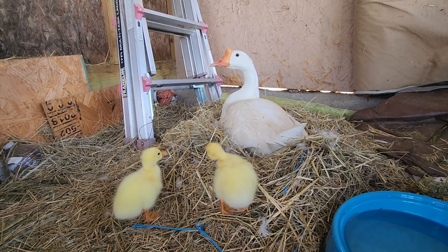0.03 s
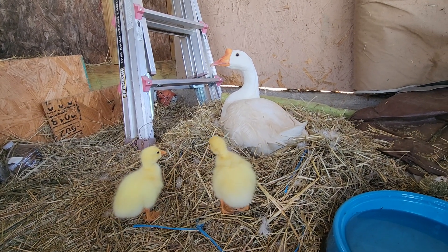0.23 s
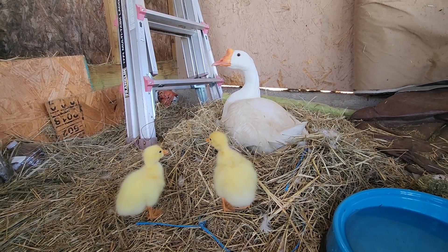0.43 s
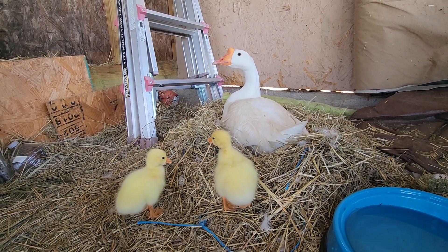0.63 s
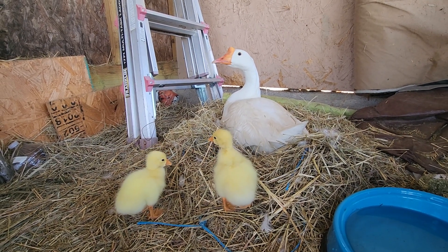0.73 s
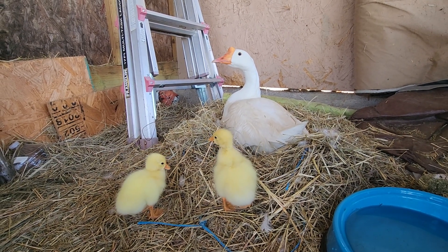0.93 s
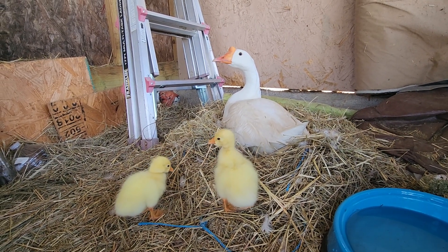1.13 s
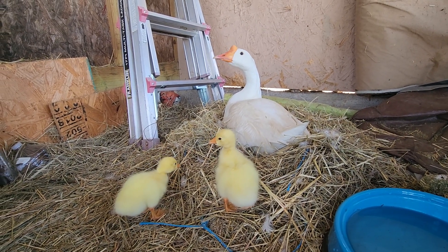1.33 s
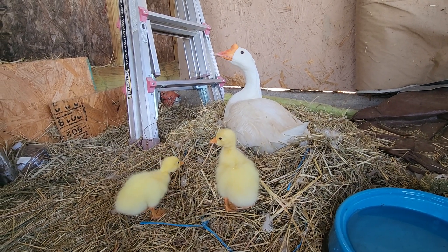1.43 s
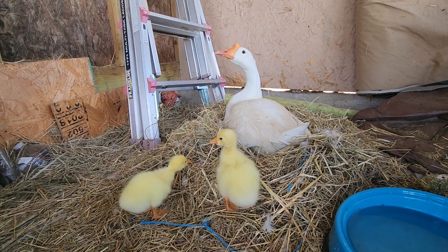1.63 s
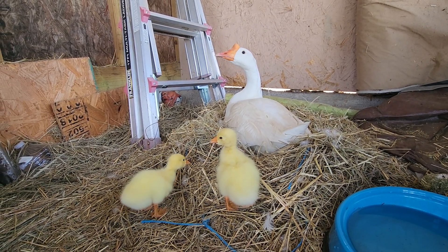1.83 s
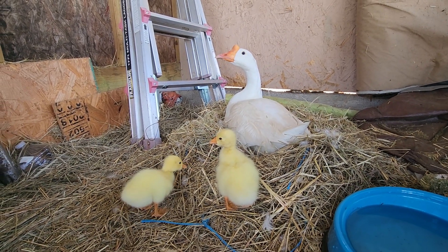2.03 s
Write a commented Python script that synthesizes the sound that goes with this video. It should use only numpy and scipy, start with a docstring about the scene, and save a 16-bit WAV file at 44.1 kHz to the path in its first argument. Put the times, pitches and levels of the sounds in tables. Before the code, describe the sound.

Three quick husky gosling peeps open the scene after a tiny rattling click, with faint breathy whistles from another bird. Then mostly quiet: sparse straw snaps and taps, low hum and distant hiss in a small, dry shelter.

```python
"""Straw rustles over a wavering mains hum, lumpy rumble and distant hiss, all shaped from noise and one sine.
A gosling in a straw-lined shelter clicks its throat in short resonant pulses, then gives three arching peeps:
gliding near-sines that break into noise over their crests, with hissing breath. Another answers faintly in
breathy whistles. Stalks snap in tiny noise bursts, straw ticks in rough rings, and something bumps near
the microphone in low thuds. Early echoes and a short tail place the gosling, snaps and ticks in the shelter."""
import sys
import numpy as np
from scipy import signal
from scipy.fft import rfft, irfft, next_fast_len
from scipy.io import wavfile
from scipy.ndimage import uniform_filter1d

SR = 44100
rng = np.random.default_rng(int(sys.argv[2]) if len(sys.argv) > 2 else 0)


def ratio_of_db(decibels):
    """Turn decibels (scalar or array-like) into linear amplitude factors; 0 dB maps to 1."""
    return 10 ** (np.asarray(decibels, float) / 20)


def wav_out(sig):
    """Save sig, one row per channel (or a flat mono array), as 16-bit PCM at SR to the path in sys.argv[1]."""
    wavfile.write(sys.argv[1], SR, np.round(np.clip(np.atleast_2d(sig).T, -1, 1) * 32767).astype(np.int16))


N = 92169
T = np.arange(N) / SR


def rms_one(x):
    """Scale to rms 1."""
    return x / np.sqrt(np.mean(x ** 2) + 1e-20)


def at_hz(points, hz):
    """Read a table on a log-frequency axis."""
    table_hz, values = np.transpose(points)
    return np.interp(np.log(hz), np.log(table_hz), values)


def drift(rate):
    """Smooth random wandering at about rate per second, rms 1."""
    r = np.exp(-2 * np.pi * rate / SR)
    wander = signal.lfilter([1], [1, -2 * r, r * r], rng.standard_normal(N + SR))
    return rms_one(wander[SR:])   # the first second lets the filter settle


def pan(x, left_db):
    """Place a mono sound by how much louder the left is, in dB."""
    left, right = ratio_of_db(left_db / 2), ratio_of_db(-left_db / 2)
    return np.array([x * left, x * right]) * 2 / (left + right)


def glide(u, first_hz, last_hz, waver_hz=0):
    """Phase of a pitch sliding from first to last as u runs from 0 to 1."""
    return 2 * np.pi * np.cumsum(first_hz + (last_hz - first_hz) * u + waver_hz) / SR


# how alike left and right noise are: (frequency [Hz], likeness [0 to 1])
ALIKENESS = [(30, .93), (150, 1), (400, 0.81), (900, 0.39), (1600, 0.14), (6000, 0.13), (14000, 0.14)]


def coloured(spectrum):
    """Stereo noise of the given spectrum, rms 1; the mid-side balance sets how alike the channels are."""
    size = next_fast_len(N)
    hz = np.maximum(np.arange(size // 2 + 1) * SR / size, 1)
    alike = np.clip(at_hz(ALIKENESS, hz), 0, 1)
    mid, side = rfft(rng.standard_normal((2, size))) * ratio_of_db(at_hz(spectrum, hz))
    mid, side = mid * np.sqrt(1 + alike), side * np.sqrt(1 - alike)
    return rms_one(irfft(np.array([mid + side, mid - side]), size)[:, :N])


# colour of the low rumble: (frequency [Hz], relative level per Hz [dB])
RUMBLE_COLOUR = [(12, -56), (20, -9), (60, -5), (91, -14.5), (102, -8), (123, 5), (150, -12.5), (292, -36),
                 (400, -37), (520, -66), (880, -120)]
# colour of the distant hiss: (frequency [Hz], relative level per Hz [dB])
AIR_COLOUR = [(180, -30.5), (300, -8.5), (404, -6), (454, -23), (485, -3.5), (535, -18), (591, -5.5),
              (664, -11.5), (733, -7.5), (1150, -12.5), (1620, 0.5), (1820, -8.5), (2260, -8), (2660, -22),
              (3360, -17.5), (4440, -30), (5600, -15.5), (8060, -39), (15600, -45.5)]


def background():
    """A sine hum wavers in level over lumpy rumble and distant hiss, both coloured noise."""
    hum_hz, hum_db, hum_waver_db, hum_waver_per_s = 119.9, -46, 1, 14
    rumble_db, rumble_swing_db = -50.5, 2
    air_db, air_swing_db = -55.5, 0.87
    hum_level = np.sqrt(2) * ratio_of_db(hum_db + hum_waver_db * drift(hum_waver_per_s))
    hum = hum_level * np.sin(2 * np.pi * hum_hz * T)
    notch = signal.iirnotch(hum_hz, 2.5, fs=SR)   # leaves room for the hum
    rumble = rms_one(signal.lfilter(*notch, coloured(RUMBLE_COLOUR)))
    rumble = rumble * ratio_of_db(rumble_db + rumble_swing_db * drift(3.6))
    return hum + rumble + ratio_of_db(air_db + air_swing_db * drift(15)) * coloured(AIR_COLOUR)


# stirs of the straw: (start [s], rise [s], level [dB], 60 dB decay time [s])
STIRS = [(0.001, .02, -55.5, .3), (0.159, .04, -56, 0.66), (0.359, 0.0033, -45.5, 0.45),
         (0.524, 0.0055, -43.5, 0.29), (0.639, 0.009, -61, 0.19), (0.769, 0.0066, -58, 0.94),
         (0.939, 0.0074, -57.5, 0.14), (0.983, 0.012, -61, 0.24), (1.145, 0.0087, -62.5, 0.21),
         (1.612, 0.056, -52.5, 0.093), (1.681, .01, -60.5, 0.3), (1.76, .02, -61.5, 1)]
# colour of the rustling: (frequency [Hz], relative level per Hz [dB])
STRAW_COLOUR = [(1470, -7.5), (2500, 2.5), (3420, 0), (3720, -1), (4950, -8.5), (6620, 0), (8080, -14.5),
                (10000, -12.5), (15600, -6.5)]


def straw():
    """Grainy bright noise that swells and dies with each stir."""
    grain_db = 0.5
    level = np.zeros(N)
    for s, rise, db, t60 in STIRS:
        swell = np.clip((T - s) / rise, 0, 1)
        level += ratio_of_db(db - 60 * np.maximum(T - s - rise, 0) / t60) * swell
    return level * ratio_of_db(grain_db * drift(220)) * coloured(STRAW_COLOUR)


# double clicks of the throat: (start [s], first pulse level [dB], resonance [Hz],
# second pulse relative to first [dB])
THROAT_CLICKS = [(.055, -22, 1044, -41), (.064, -16, 1380, -2.5), (0.0714, -13.5, 1250, -7),
                 (0.0787, -22.5, 1410, 5), (0.084, -48, 1480, -12.5), (.0895, -29, 1490, 4)]


def clicks():
    """Each click is two pulses of throat resonance that swell and die within a few cycles."""
    second_pulse_s, rise_s = 0.00148, 0.00067
    out = np.zeros(N)
    for s, db, hz, second_db in THROAT_CLICKS:
        for start, level_db in ((s, db), (s + second_pulse_s, db + second_db)):
            u = np.clip(T - start, 0, .02)
            swell = (u / rise_s * np.exp(1 - u / rise_s)) ** 3
            out += ratio_of_db(level_db) * swell * np.sin(2 * np.pi * hz * u)
    return pan(out, 0.82)


# dry snaps of a stalk: (start [s], level before filtering [dB])
STALK_SNAPS = [(0.0732, -29), (0.234, -28), (.947, -46), (1.654, -44), (1.773, -22.5), (1.808, -33)]


def snaps():
    """Broad cracks: random-sign noise dying within milliseconds, with softened treble."""
    decay_s, low_hz, high_hz, tilt_hz = 0.00062, 400, 7500, 2000
    level = np.zeros(N)
    for s, db in STALK_SNAPS:
        level += ratio_of_db(db) * (T > s) * np.exp(-np.maximum(T - s, 0) / decay_s)
    crack = level * rng.choice([-1, 1], N)
    crack = signal.lfilter(*signal.butter(1, tilt_hz, fs=SR), crack)
    band = signal.butter(6, [low_hz, high_hz], "band", fs=SR, output="sos")
    return pan(signal.sosfilt(band, crack), .4)


# contours of the three peeps: (time [s], pitch [Hz], voice level before throat filter [dB],
# left over right [dB], breath level before its gain [dB])
FIRST_PEEP = [(0.086, 1515, -83, -11.5, -60), (0.102, 1764, -16, -8.5, -61), (0.112, 1997, -26.5, -1, -54),
              (0.118, 2576, -36, -26, -51), (0.122, 2862, -44.5, -13.5, -69),
              (0.128, 2833, -51.5, 0, -51.5), (0.14, 1853, -28, -10.5, -58.5),
              (0.148, 1592, -21.5, -1.5, -61), (0.154, 1230, -36.5, 6, -62), (0.162, 1139, -48.5, -13, -64)]
SECOND_PEEP = [(0.245, 1554, -55, -2, -67), (0.265, 1759, -35.5, -16, -64), (0.277, 1747, -19.5, -7, -57),
               (0.291, 1903, -16.5, -6, -49), (0.297, 2106, -31.5, 1, -56.5),
               (0.303, 2155, -20.5, -16, -47.5), (0.311, 2462, -32.5, -2.5, -53),
               (0.321, 3195, -43.5, -18, -55), (0.331, 3195, -45.5, 4, -49), (0.341, 2440, -39.5, -10, -53),
               (0.347, 1801, -19.5, 0, -54), (0.359, 1210, -35.5, 1, -57.5), (0.366, 1191, -60, -26, -74)]
THIRD_PEEP = [(0.428, 1608, -48.5, 10, -81), (0.44, 1714, -36, -19.5, -78), (0.452, 1708, -19, -0.5, -51.5),
              (0.46, 1831, -17, -9.5, -47), (0.468, 2343, -27, -11, -51.5), (0.476, 2273, -20.5, -8, -48.5),
              (0.482, 2726, -48, -15, -45), (0.492, 3155, -39, -9, -51), (0.508, 2995, -51, -9, -51),
              (0.514, 2635, -38.5, -19, -68), (0.52, 1864, -29, 0, -57), (0.526, 1620, -35.5, 0, -56),
              (0.535, 1610, -74, -10, -79)]
# least huskiness of each peep, in order: (noise share of the voice [dB])
HUSKINESS = [-18, -17, -11]
# colour of the breath: (frequency [Hz], relative level per Hz [dB])
BREATH_COLOUR = [(2120, -10), (3600, -11), (5670, -4.5), (6450, -2.5), (8610, -20), (9730, -23),
                 (10700, -33), (11400, -8), (12800, -3.5), (15600, -15.5)]


def peeps():
    """A fluttering near-sine that breaks into rasp when high, band-passed by the throat; hissing breath."""
    flutter_db, overtone_db, breath_gain_db = .8, -33, 6
    smooth_s, gate_s, breath_edge_s = 0.001, 0.0029, 0.02
    break_from_hz, break_full_hz = 2250, 2650
    breath_pan_share = 0.18   # breath is placed closer to the middle than the voice
    voice, breath = np.zeros((2, N)), np.zeros((2, N))
    flutter, rasp, rasp_turned = drift(120), drift(450), drift(450)
    hiss = coloured(BREATH_COLOUR)
    for contour, husky_db in zip((FIRST_PEEP, SECOND_PEEP, THIRD_PEEP), HUSKINESS):
        s, *columns = np.transpose(contour)
        curves = [uniform_filter1d(np.interp(T, s, c), size=1 + int(smooth_s * SR)) for c in columns]
        hz, db, left_db, breath_db = curves
        inside = np.minimum(T - s[0], s[-1] - T)   # seconds to the nearer end of the peep
        gate = np.clip(inside / gate_s, 0, 1)
        broken = np.clip((hz - break_from_hz) / (break_full_hz - break_from_hz), ratio_of_db(husky_db), .9)
        phase = 2 * np.pi * np.cumsum(hz) / SR
        clear = np.sqrt(1 - broken ** 2) * np.sin(phase)
        husk = broken * (rasp * np.sin(phase) + rasp_turned * np.cos(phase)) / np.sqrt(2)
        tone = clear + husk + ratio_of_db(overtone_db) * np.sin(2 * phase)
        voice += pan(np.sqrt(2) * gate * ratio_of_db(db + flutter_db * flutter) * tone, left_db)
        breath_edge = np.clip(1 + inside / breath_edge_s, 0, 1) ** 2   # fades just outside the peep
        breath += pan(breath_edge * ratio_of_db(breath_db + breath_gain_db), breath_pan_share * left_db) * hiss
    throat = signal.butter(3, [1100, 3370], "band", fs=SR, output="sos")
    return signal.sosfilt(throat, voice), breath


# soft clear after-note: (start [s], length [s], first pitch [Hz], last pitch [Hz], level [dB])
SOFT_NOTE = (.162, .045, 1470, 1640, -43)


def after_note():
    """A quiet clean gliding sine trails the first peep, swelling and fading."""
    s, length, first_hz, last_hz, db = SOFT_NOTE
    u = np.clip((T - s) / length, 0, 1)
    return pan(ratio_of_db(db) * np.sin(np.pi * u) * np.sin(glide(u, first_hz, last_hz)), -3.0)


# faint calls further off: (start [s], length [s], first pitch [Hz], last pitch [Hz], level [dB])
FAINT_CALLS = [(0.17, 0.12, 3240, 3370, -59), (0.176, .035, 1100, 1100, -61),
               (0.379, 0.065, 2790, 3660, -55), (0.416, 0.17, 6070, 6340, -54.5),
               (0.544, .09, 6320, 6110, -56.5), (0.556, 0.081, 3085, 2800, -53),
               (0.566, 0.086, 2530, 2350, -58.5)]


def far_calls():
    """Thin gliding whistles made breathy by narrow noise around the pitch; they swell and fade."""
    waver_hz, husk_per_s, clear_share = 40, 140, .1
    out = np.zeros(N)
    waver, husk, husk_turned = drift(45), drift(husk_per_s), drift(husk_per_s)
    for s, length, first_hz, last_hz, db in FAINT_CALLS:
        u = np.clip((T - s) / length, 0, 1)
        phase = glide(u, first_hz, last_hz, waver_hz * waver)
        whistle = (clear_share + husk) * np.sin(phase) + husk_turned * np.cos(phase)
        out += ratio_of_db(db) * np.sin(np.pi * u) ** 0.36 * whistle
    return pan(out, -7.0)


# ticks and taps in the straw: (start [s], level [dB], pitch [Hz], 60 dB decay time [s])
STRAW_TAPS = [(.231, -31, 1175, 0.017), (.232, -42, 603, 0.016), (0.522, -25.5, 917, 0.014),
              (.525, -36.5, 460, 0.086), (0.529, -36, 289.4, 0.091), (0.545, -39, 225, 0.089),
              (.6, -48.5, 197, 0.13), (.775, -50, 240, 0.096), (1.01, -43.5, 3260, 0.027),
              (1.152, -29, 1000, 0.045), (1.154, -45.5, 400, 0.063), (1.165, -58, 1100, 0.013),
              (1.174, -38, 1510, 0.037), (1.655, -35.5, 847, .025), (1.672, -39.5, 950, 0.03),
              (1.775, -35.5, 364, 0.036), (1.808, -39, 420, 0.029)]


def taps():
    """Short decaying rings, roughened in level and wrapped in dull noise."""
    roughness, noise_db, rise_s = .4, -8, 0.002
    out, rough = np.zeros(N), drift(100)
    dull = signal.butter(2, [300, 2500], "band", fs=SR, output="sos")
    noise = rms_one(signal.sosfilt(dull, rng.standard_normal(N)))
    for s, db, hz, t60 in STRAW_TAPS:
        u = np.maximum(T - s, 0)
        ring = (1 + roughness * rough) * np.sin(2 * np.pi * hz * u) + ratio_of_db(noise_db) * noise
        out += ratio_of_db(db - 60 * u / t60) * (1 - np.exp(-u / rise_s)) * ring
    return pan(out, -.3)


# soft low thuds: (start [s], level [dB], pitch [Hz], rise [s])
LOW_THUDS = [(0.522, -26.5, 120, 0.0083), (0.557, -32.5, 62.6, 0.01), (0.576, -33, 36.2, 0.021),
             (.86, -43, 31.8, 0.019)]


def bump():
    """Low sine thuds that swell and die within a few cycles."""
    out = np.zeros(N)
    for s, db, hz, rise in LOW_THUDS:
        u = np.maximum(T - s, 0)
        out += ratio_of_db(db) * u / rise * np.exp(1 - u / rise) * np.sin(2 * np.pi * hz * u)
    return pan(out, 1.6)


# early echoes of the shelter: (delay [s], left level [dB], right level [dB])
EARLY_ECHOES = [(.0036, -7.5, -45), (.0075, -33, -13.5), (0.0101, -26, -16), (.017, -41.5, -45)]


def shelter(x):
    """Convolve with a few early echoes and a short diffuse tail of decaying noise."""
    tail_db, tail_t60_s = -12, 0.18
    size = int(.35 * SR)
    t = np.arange(size) / SR
    tail = rng.standard_normal((2, size)) * ratio_of_db(-60 * t / tail_t60_s) * (t > .004)
    response = ratio_of_db(tail_db) * rms_one(tail) / np.sqrt(size)
    for delay, left_db, right_db in EARLY_ECHOES:
        response[:, int(delay * SR)] += ratio_of_db(np.array([left_db, right_db]))
    return signal.fftconvolve(x, response, axes=1)[:, :N]


def scene():
    """Gosling and snaps reach both microphone ports together; the rest reaches the right slightly later."""
    right_lag_samples = 7
    voice, breath = peeps()
    gosling = voice + clicks() + far_calls() + after_note()
    litter, cracks = taps(), snaps()
    rest = background() + straw() + litter + shelter(litter) + bump()
    rest = np.array([rest[0], np.roll(rest[1], right_lag_samples)])
    return gosling + cracks + shelter(gosling + cracks) + breath + rest


def roll_off(x):
    """The treble ends steeply here."""
    return signal.sosfilt(signal.butter(12, 15770, fs=SR, output="sos"), x)


def record(dry):
    """Turn the finished mix into the final sound."""
    return roll_off(dry)


dry = scene()
out = record(dry)
wav_out(out)
```